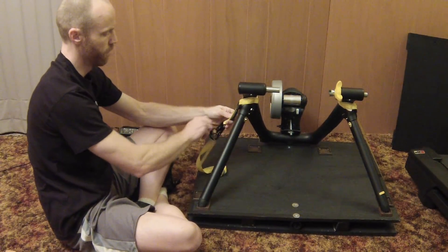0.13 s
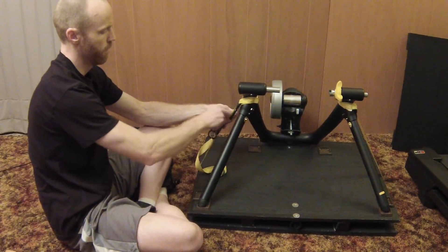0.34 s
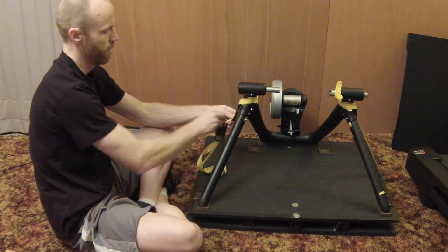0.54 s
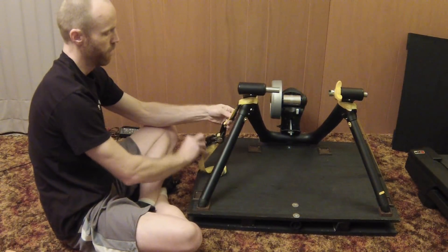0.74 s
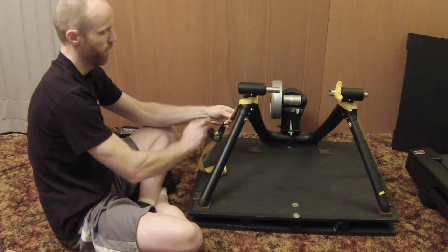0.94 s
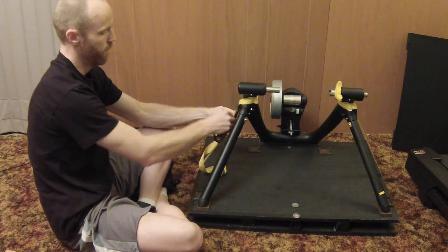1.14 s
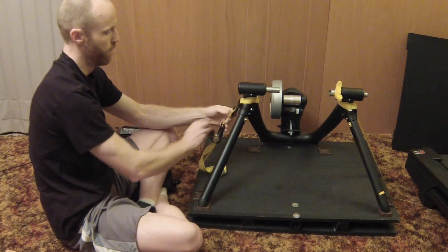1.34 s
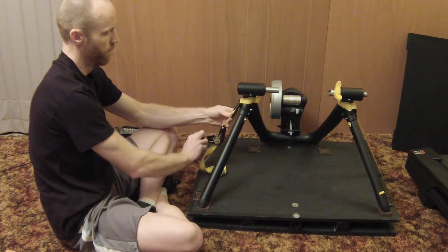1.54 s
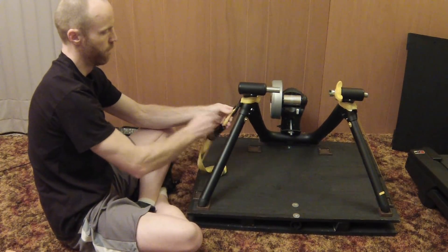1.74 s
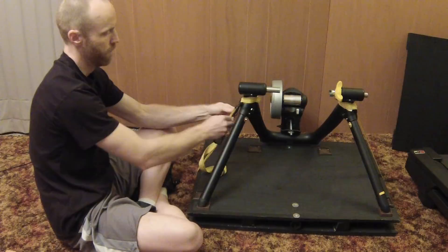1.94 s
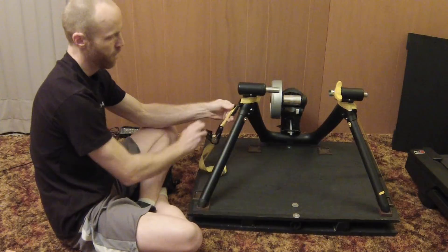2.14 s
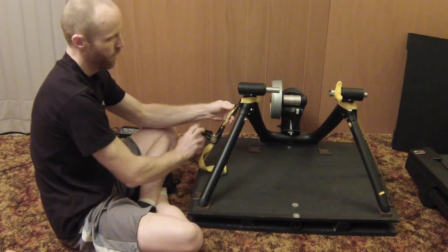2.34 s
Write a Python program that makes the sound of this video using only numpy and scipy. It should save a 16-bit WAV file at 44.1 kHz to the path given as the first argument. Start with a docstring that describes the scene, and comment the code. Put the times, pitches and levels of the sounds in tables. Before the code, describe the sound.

A ratchet strap buckle is cranked by hand in a small, quiet room. Sharp metallic clicks come in groups of two to four, around 0.4, 0.8, 1.1, 1.5, 1.9 and 2.2 seconds. Clicks near 1.5 seconds and later knock dully into a metal stand. The pivot squeaks briefly near 0.7 and 2.2 seconds, with faint strap creaks and a soft rustle of handling underneath.

```python
"""Ratchet strap on a stand

A steel ratchet buckle is cranked by hand to tighten a strap on a tubular stand, in a small panelled room.
The pawls snap over the teeth, a few clicks to each swing; the harder ones knock through into the stand.
The pivot squeaks now and then, the strap creaks under load, and the room answers over a quiet floor."""
import sys
import numpy as np
from scipy import signal
from scipy.fft import rfft, irfft, next_fast_len
from scipy.io import wavfile
from scipy.ndimage import uniform_filter1d

SR = 44100
rng = np.random.default_rng(int(sys.argv[2]) if len(sys.argv) > 2 else 0)


def to_wav(sig):
    """Store sig (one row per channel, or 1-D mono) as 16-bit WAV at the path in sys.argv[1].

    Samples outside -1..1 are clipped; the rate is SR.
    """
    pcm = np.clip(np.atleast_2d(sig), -1, 1) * 32767
    pcm = np.round(pcm).astype(np.int16)
    wavfile.write(sys.argv[1], SR, pcm.T)  # frames by channels


N = 109368


def pawl(gain_db=-3, buckle_db=-20.5, thud_db=-4.5, stand_db=-0.5, rebound_db=-9.5):
    """Each snap over a tooth cracks, rebounds once, rings the buckle and knocks the stand."""
    # Each row: start in seconds, steel level in dB, treble and clack in dB relative to the steel,
    # knock level in dB, ping pitch in Hz, ping in dB relative to the steel. The gains above trim these.
    clicks = [(.084, -65.5, -11, -9, -76, 5520, 0.5), (0.261, -61.5, -3, -4.5, -76, 5540, -4),
              (.290, -48, 0, -8, -76, 6260, -2.5), (.342, -32.5, 1, -14, -89, 5670, -3.5),
              (0.449, -29.5, 0, -10, -75, 6230, -4), (.643, -53.5, -4.5, -3, -69.5, 6180, -18),
              (.715, -30, -5, -12.5, -57.5, 6580, -11), (0.759, -30, -2, -13.5, -59, 6020, -16),
              (.865, -34, 0.5, -11, -52.5, 7190, -5), (1.006, -44, -4.5, -11, -61.5, 6520, -4.5),
              (1.071, -27.5, -3.5, -18, -57.5, 6600, -5), (1.1289, -31, 3.5, -12.5, -49.5, 5760, 2),
              (1.191, -35, 3.5, -5, -53.5, 6770, 4.5), (1.34, -52, -20, -10.5, -67.5, 6000, -19),
              (1.365, -54.5, -3, -4.5, -59, 4770, -4), (1.437, -30, 0, -8.5, -39.5, 4100, -8.5),
              (1.485, -32, 1, -8, -38.5, 5350, -34), (1.751, -50.5, -5, -13, -77, 5930, -16),
              (1.764, -44, -1, -12, -83, 5920, -2), (1.782, -45.5, -4.5, -8.5, -68.5, 5900, -19),
              (1.883, -31, 2, -12, -55.5, 6330, -8.5), (1.955, -36.5, -1, -4, -45, 6790, -3),
              (2.110, -48.5, -1.5, -11, -59, 6030, -21), (2.199, -28.5, -3.5, -7, -46, 4490, -3),
              (2.334, -32, -4, -9, -42, 4540, -6.5), (2.475, -53, -15, -2.5, -64, 5070, -4)]
    # The pawl slides off a tooth just before it seats. Each row: start in seconds, level in dB.
    slips = [(0.857, -36.5), (1.187, -31.5), (1.953, -37), (2.195, -35.5), (2.324, -37)]
    # Tone curves of a snap. Each row: frequency in Hz, relative level in dB.
    steel_eq = [(1500, -33.5), (2400, -13.5), (3000, -10.5), (3700, -4.5), (4500, 0.5), (6300, 4),
                (7600, 0), (9000, -4.5), (12000, -32.5)]  # bright core
    treble_eq = [(5000, -50.5), (7500, -12.5), (9000, -2), (11000, 5), (13000, 6), (15000, 4),
                 (16000, -13.5)]  # top-end sizzle
    clack_eq = [(400, -32), (900, -13), (1400, -4.5), (2300, 4.5), (3000, 13.5), (3700, -15), (6000, -35.5)]  # hard midrange
    thud_eq = [(80, -26.5), (200, 3.5), (330, 4.5), (550, -3.5), (800, -5.5), (1150, -3.5), (1700, -18.5),
               (3000, -43.5)]  # low body of the knock
    # Ringing modes. Each row: frequency in Hz, relative level in dB, 60 dB decay time in seconds.
    buckle_modes = [(2955, -13, 0.034), (4400, 4, 0.09), (4470, -15, .12), (5230, -15, 0.16),
                    (5805, -26, 0.062), (6000, -5, .1), (6770, -7, 0.045), (6700, 1, 0.14),
                    (7480, -5, 0.24), (12200, -24, 0.066), (14600, -11, 0.055)]
    stand_modes = [(251, -8, 0.12), (341.2, 1, .28), (515.4, 3.5, 0.22), (698, -1.5, 0.26),
                   (942, -3.5, 0.13), (1163, -4.5, 0.15), (1426, -9, 0.18)]
    crack_t60, ping_t60, thud_t60, rebound_s = .0022, .016, .041, .008  # seconds
    out = np.zeros(N)
    for start, db, treble_db, clack_db, knock_db, ping_hz, ping_db in clicks:
        path, crack = room(), burst(crack_t60)
        add(crack, rebound_s * (.5 + rng.random()), amp(rebound_db) * burst(crack_t60))
        layers = [(0, colour(crack, steel_eq)),
                  (treble_db, colour(crack, treble_eq)),
                  (clack_db, colour(crack, clack_eq)),
                  (buckle_db, ring(buckle_modes)),
                  (ping_db, ring([(ping_hz, 0, ping_t60)]))]
        steel = sum(amp(layer_db) * heard(layer, path) for layer_db, layer in layers)
        thud = amp(thud_db) * heard(colour(burst(thud_t60), thud_eq), path)
        stand = amp(stand_db) * heard(ring(stand_modes), burst(thud_t60))
        add(out, start, amp(db) * steel + amp(knock_db) * (thud + stand))
    for start, db in slips:
        tick = colour(burst(crack_t60), steel_eq)
        add(out, start, amp(db) * heard(tick, room()))
    return amp(gain_db) * out


def burst(t60):
    """A contact lasting t60 seconds that excites all frequencies about evenly."""
    t = clock()
    spectrum = rfft(rng.standard_normal(len(t)) * amp(-60 * t / t60))
    return irfft(spectrum / (np.abs(spectrum) + 1e-9), len(t)) * (t < t60)


def ring(modes, scatter_db=2):
    """Struck modes die away, balanced a little differently at each blow."""
    t = clock()
    out = np.zeros(len(t))
    for hz, db, t60 in modes:
        decay = amp(db + scatter_db * rng.normal() - 60 * t / t60)
        out += decay * np.sin(2 * np.pi * hz * t) * rng.choice([-1, 1])
    return out


def tube():
    """The hardest knock leaves one lightly damped tube of the stand singing."""
    # Each row: start in seconds, pitch in Hz, level in dB, 60 dB decay time in seconds.
    tones = [(1.486, 959, -58, 0.9)]
    out, t = np.zeros(N), clock()
    for start, hz, db, t60 in tones:
        add(out, start, amp(db - 60 * t / t60) * np.sin(2 * np.pi * hz * t))
    return out


def pivot(waver_depth=.042):
    """Dry steel rubs on steel: short, unsteady squeaks that glide a little."""
    # Each row: start and length in seconds, first and last pitch in Hz, level in dB,
    # octave overtone in dB relative to the fundamental.
    squeaks = [(0.653, 0.0524, 2710, 3174, -41.5, -8.5), (.715, 0.03, 3038, 2900, -43.5, -11),
               (2.154, 0.0072, 3260, 3160, -57, -15), (2.203, 0.012, 2790, 2890, -44, -22),
               (2.21, .026, 5005, 5290, -35, -4.5)]
    out, t = np.zeros(N), clock()
    for start, length, from_hz, to_hz, db, octave_db in squeaks:
        progress = np.clip(t / length, 0, 1)
        glide_hz = from_hz + (to_hz - from_hz) * progress
        waver = 1 + waver_depth * wander(len(t), smooth_samples=60)
        phase = 2 * np.pi * np.cumsum(glide_hz * waver) / SR
        tone = np.sin(np.pi * progress) * (np.sin(phase) + amp(octave_db) * np.sin(2 * phase))
        add(out, start, amp(db) * heard(tone, room()))
    return out


def strap(jerks_per_s=500):
    """Webbing slips on the spool in a quick run of tiny jerks."""
    # Each row: start and length in seconds, body level in dB, rasp level in dB.
    creaks = [(0.733, 0.05, -45.5, -55), (1.817, 0.018, -43, -48), (2.199, 0.029, -49.5, -68)]
    # The creak's dull body and gritty rasp. Each row: frequency in Hz, relative level in dB.
    body_eq = [(40, -48.5), (110, -24.5), (150, -12), (190, -5), (270, 0), (400, -9), (800, -14.5),
               (1500, -17), (3000, -23.5)]
    rasp_eq = [(300, 15), (800, -8.5), (2500, 1.5), (6000, 0.5), (10000, -12), (16000, -10)]
    out, t = np.zeros(N), clock()
    for start, length, body_db, rasp_db in creaks:
        slipping = (rng.random(len(t)) < jerks_per_s / SR) * (t < length)
        jerks = slipping * rng.standard_normal(len(t))
        jerks[0] = 1  # every creak opens with a jerk
        body = amp(body_db) * heard(colour(jerks, body_eq), room())
        rasp = amp(rasp_db) * heard(colour(jerks, rasp_eq), room())
        add(out, start, body + rasp)
    return out


def handling(flutter_db=2.5):
    """Hands and strap rustle faintly, with a fluttering level."""
    # The rustle's fader moves. Each row: time in seconds, level in dB.
    fader = [(0, -61.5), (.05, -64.5), (.13, -80), (.18, -93), (1.66, -73.5), (2.1, -97), (2.15, -56),
             (2.19, -58), (2.3, -64), (2.48, -63.5)]
    # Each row: frequency in Hz, relative level in dB.
    rustle_eq = [(200, 1.5), (1000, -6), (2500, -6), (6000, -7.5), (12000, -11.5), (16000, -18.5)]
    level_db = np.interp(np.arange(N) / SR, *np.transpose(fader))
    level_db += flutter_db * wander(N, smooth_samples=500)
    return amp(level_db) * unit(colour(rng.standard_normal(N), rustle_eq))


def room(echoes=6, direct_db=-14, walls_db=-5.5, build_s=.004):
    """One path through the room: direct sound, near walls, and a tail that dies sooner in the treble."""
    # Reverb time. Each row: frequency in Hz, 60 dB decay time in seconds.
    reverb_t60 = [(200, 0.24), (530, 0.31), (1400, 0.25), (3700, 0.22), (9700, 0.17), (15000, 0.16)]
    t = clock()
    hz, frame_s, spectra = signal.stft(rng.standard_normal(len(t)), SR, nperseg=256)
    decay = amp(-60 * frame_s / along(reverb_t60, hz)[:, None])
    tail = signal.istft(spectra * decay, SR, nperseg=256)[1][:len(t)]
    path = norm(tail * (1 - np.exp(-t / build_s)))
    path[0] += amp(direct_db)
    echo_s = rng.uniform(.004, .013, echoes)
    path[(echo_s * SR).astype(int)] += amp(walls_db) * rng.choice([-1, 1], echoes) / np.sqrt(echoes)
    return norm(path)


def room_tone(level_db=-67):
    """A steady, quiet bed of low rumble and thin hiss."""
    # Each row: frequency in Hz, relative level in dB.
    floor_eq = [(20, 1.5), (40, -5), (68, -2.5), (120, -6.5), (200, -7), (400, -14.5), (760, -19.5),
                (1300, -17), (3000, -23.5), (11000, -26), (16000, -25)]
    return amp(level_db) * unit(colour(rng.standard_normal(N), floor_eq))


def heard(x, path, span_s=.038):
    """x convolved with a path, scaled to the energy of span_s seconds at rms 1."""
    return norm(signal.fftconvolve(x, path)[:len(x)]) * np.sqrt(span_s * SR)


def colour(x, eq):
    """Minimum-phase EQ through (Hz, dB) points, so nothing rings ahead of an attack."""
    size = 2 * next_fast_len(len(x))
    gain = amp(along(eq, np.fft.rfftfreq(size, 1 / SR)))
    cepstrum = irfft(np.log(gain), size)
    cepstrum[1:size // 2] *= 2
    cepstrum[size // 2 + 1:] = 0
    return irfft(rfft(x, size) * np.exp(rfft(cepstrum)), size)[:len(x)]


def along(points, hz):
    """Interpolate (Hz, value) points on a log frequency axis."""
    point_hz, values = np.transpose(points)
    return np.interp(np.log(hz + 1), np.log(point_hz + 1), values)


def wander(samples, smooth_samples):
    """Smoothed random motion at rms 1."""
    return unit(uniform_filter1d(rng.standard_normal(samples), smooth_samples))


def amp(db):
    """Decibels to gain."""
    return 10 ** (np.asarray(db) / 20)


def unit(x):
    """Scaled to rms 1."""
    return x / np.sqrt(np.mean(x ** 2) + 1e-20)


def norm(x):
    """Scaled to energy 1."""
    return x / np.sqrt(np.sum(x ** 2) + 1e-20)


def clock():
    """Half a second of time for one event."""
    return np.arange(SR // 2) / SR


def add(out, start_s, x):
    """Mix x into out at start_s."""
    part = out[max(round(start_s * SR), 0):][:len(x)]
    part += x[:len(part)]


def scene():
    """The ratchet, stand and strap over the room tone, in mono."""
    return (pawl() + tube() + strap() + pivot() + handling() + room_tone())[None]


def record(dry, top_hz=15750):
    """A brick-wall low-pass takes off the very top."""
    size = next_fast_len(N + SR // 2)
    passband = np.fft.rfftfreq(size, 1 / SR) < top_hz
    return irfft(rfft(dry, size) * passband, size)[..., :N]


dry = scene()
out = record(dry)
to_wav(out)
```